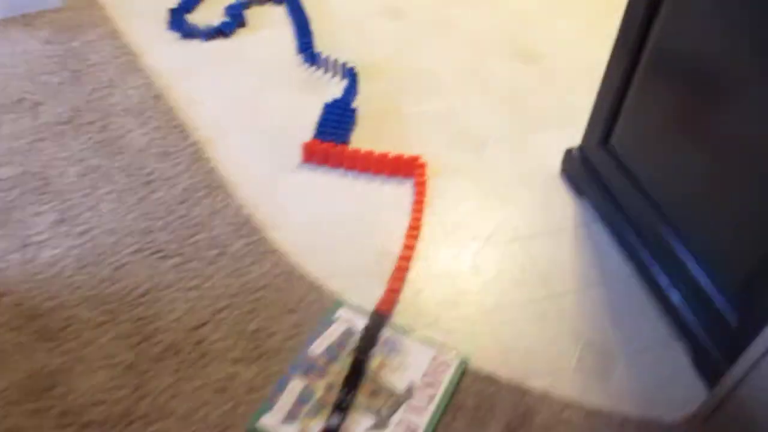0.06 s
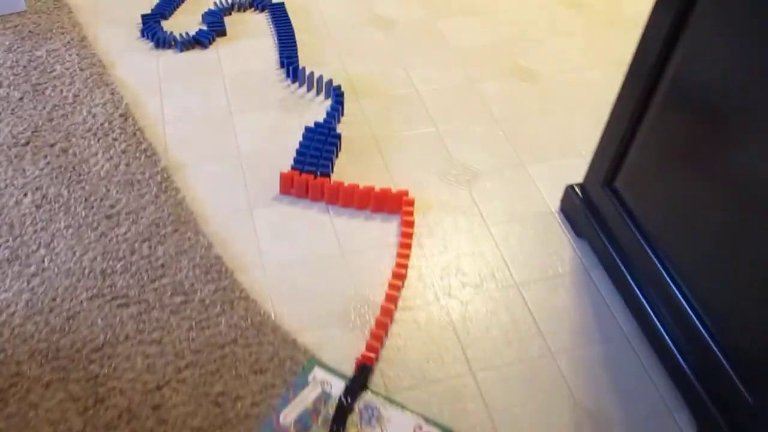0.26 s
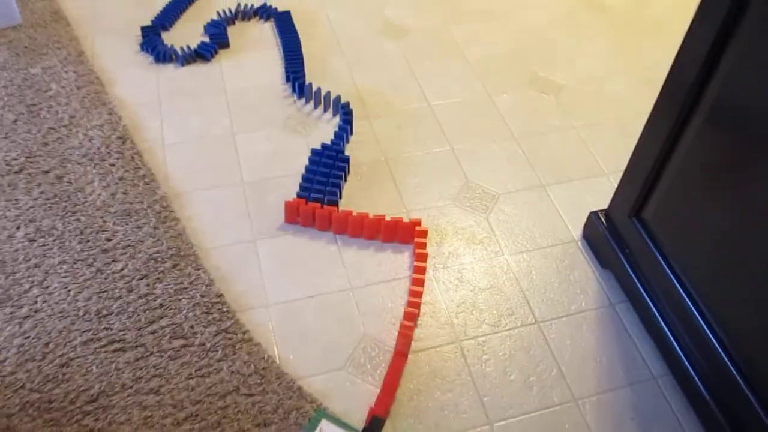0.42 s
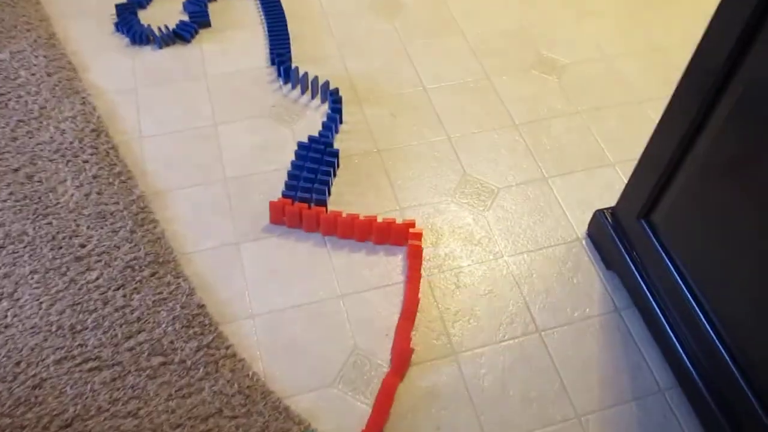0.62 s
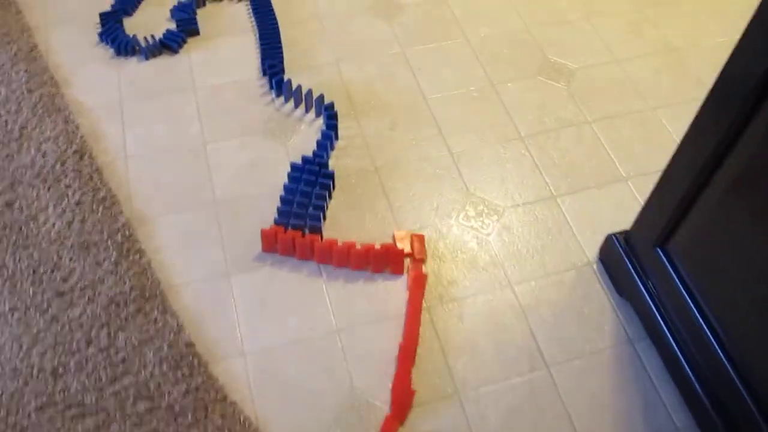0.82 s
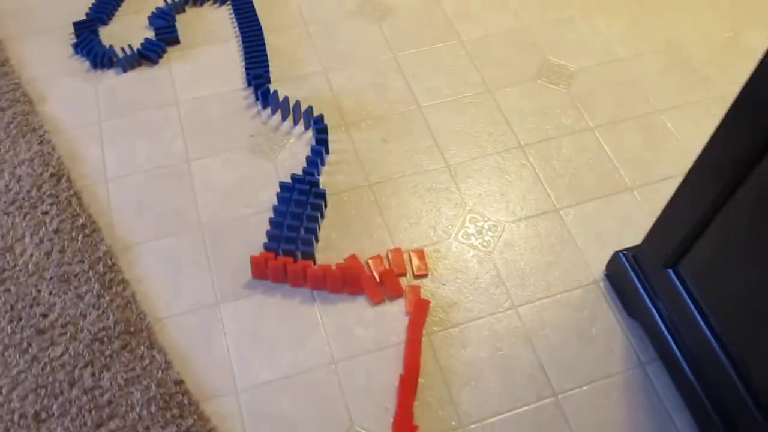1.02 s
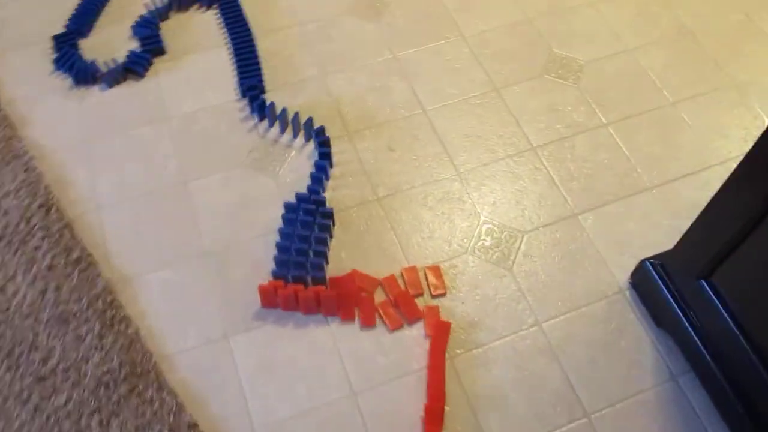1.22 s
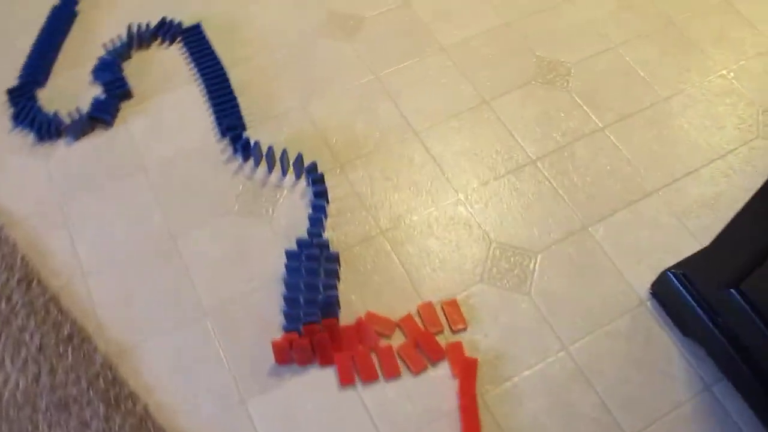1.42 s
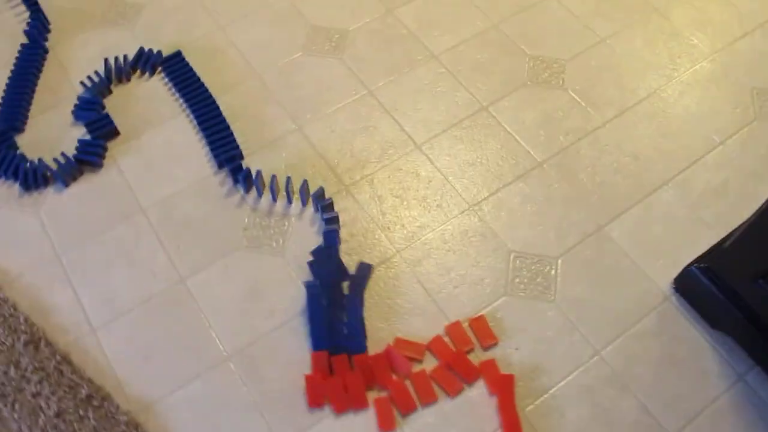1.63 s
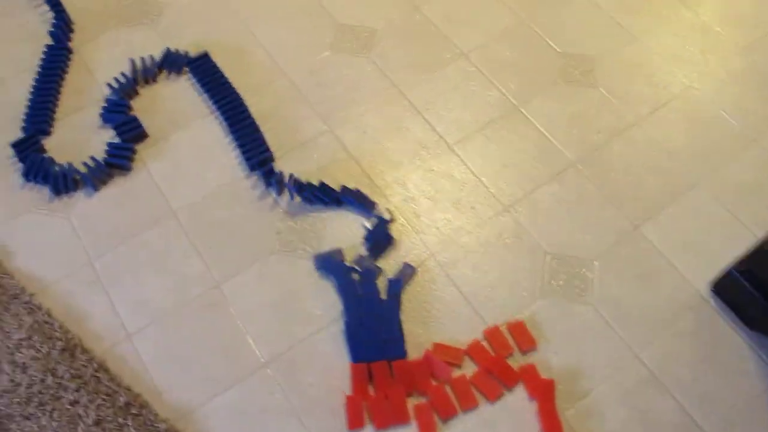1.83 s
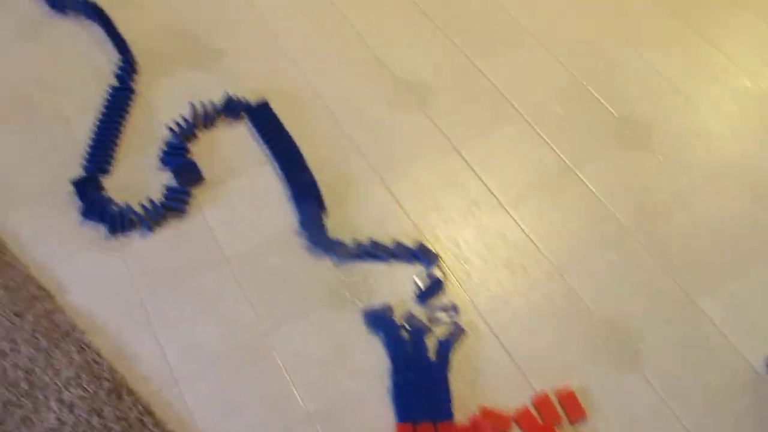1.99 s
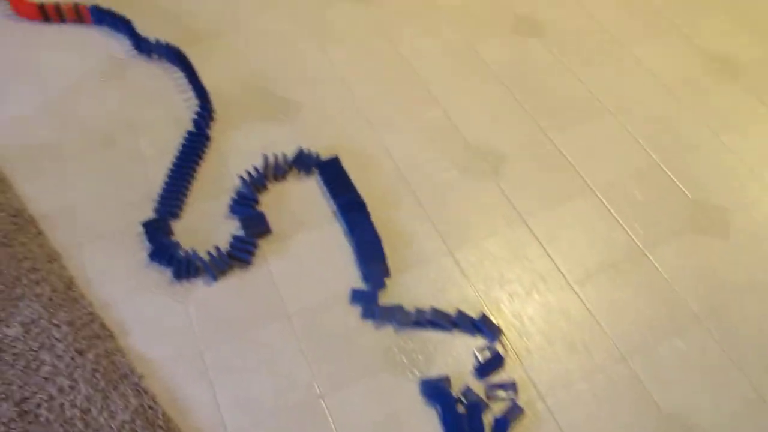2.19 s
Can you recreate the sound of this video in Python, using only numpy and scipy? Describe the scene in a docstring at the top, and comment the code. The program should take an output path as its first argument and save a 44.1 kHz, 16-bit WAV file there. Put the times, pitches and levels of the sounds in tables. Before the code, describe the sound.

A line of plastic dominoes falls on a vinyl floor, heard close up in a small room. Rapid clicking gives way to spaced clacks, then a stacked block tumbles in a loud rattle and the clicks grow fainter.

```python
"""A small kitchen, microphone close to the vinyl floor, where a line of plastic dominoes topples.
A quick run starts on a cardboard box and leads to a slow row of single clacks; then a block
collapses and the run moves away. Each knock is a hard clack plus the tile's thin ring. Leaning tiles
rattle behind the front and the floor drums under them, over a short room tail and a faint rumble."""
import sys
import numpy as np
from scipy import signal
from scipy.io import wavfile

SR = 44100
rng = np.random.default_rng(int(sys.argv[2]) if len(sys.argv) > 2 else 0)


def wav_out(sig):
    """Save sig, one row per channel (or a flat mono array), as 16-bit PCM at SR to the path in sys.argv[1]."""
    wavfile.write(sys.argv[1], SR, np.round(np.clip(np.atleast_2d(sig).T, -1, 1) * 32767).astype(np.int16))


N = 103635

UPPER_DB_PER_DB = -0.27  # the harder the knock, the smaller the share of its upper modes
# single knocks at close range (time [s], level [dB], ring [dB], tilt [dB/octave],
# clack resonance [Hz], chatter decay [s], left over right [dB])
FRONT_KNOCKS = [(0.0104, -7.5, -23, 2, 1770, 0.0018, 1.5), (0.0383, -12, -13, -2.5, 1810, 0.0042, 5),
                (0.0664, -7, -11, 12, 5640, 0.0012, 1), (0.091, -13, -14, 7, 8240, 0.0009, 4),
                (0.1078, -7, -17, 1.5, 2300, 0.001, -3), (0.234, 0, -12, -1.5, 2160, 0.0016, 1),
                (0.2643, -9.5, -4.5, 5, 5000, 0.0022, 0), (0.309, -2.5, 0.5, -1, 4950, 0.0033, -1.5),
                (0.3389, -2, 12, -1, 7600, 0.0046, 0), (0.3692, -3.5, 12, 1, 2700, 0.0063, 1),
                (0.3765, -10, 13.5, 1, 5170, 0.0015, 0), (0.4022, 2, -3, 1.5, 3570, 0.0027, 0.5),
                (0.4298, -1.5, 5.5, -2, 2400, 0.002, -8), (0.441, -1, -13, 8, 5770, 0.0032, 1),
                (0.482, -0.5, -5, -2.5, 1650, 0.0037, -2), (0.488, -2.5, -9, 6, 3000, 0.0041, -2),
                (0.515, -3.5, 10.5, -0.5, 5440, 0.0075, -11), (0.5364, -3.5, 4, 0, 1830, 0.0038, 12),
                (0.567, -7.5, 16, 5, 5550, 0.0019, -3), (0.5919, -7, -6, -4, 5510, 0.0028, -13),
                (0.593, -1, 2, 16, 4740, 0.0022, 0), (0.6197, 5.5, 7, -1, 5160, 0.011, -5),
                (0.6457, -3, 6, 5, 2650, 0.0039, -1), (0.6828, -1, 10, 9, 5200, 0.003, 0),
                (0.7492, 2, 5, 1.5, 4850, 0.0014, -5), (0.7565, 10, -9, 4, 4800, 0.0011, 0.5),
                (0.8482, 2, -34, -1.5, 4780, 0.00077, -3), (0.8855, -10, -23, -5, 4910, 0.0037, -10),
                (0.8932, -8, 0, 8, 7150, 0.0059, 0), (0.9485, -10.5, -9, 3, 6850, 0.0035, -1),
                (0.975, 10, -2.5, -1.5, 6100, 0.0023, 1.5), (1.0327, 2, -14, -0.5, 3410, 0.0056, -1),
                (1.039, -18, -17, 5, 3730, 0.0008, -7), (1.0523, 5, -6.5, 2, 2800, 0.0009, -4.5),
                (1.0772, -3.5, -11, -1.5, 2220, 0.0014, -4), (1.1344, -1, -13, -1.5, 2310, 0.0024, -3),
                (1.1615, 7, -6.5, -1, 5900, 0.0002, -1), (1.1673, -12, -17, 2, 7340, 0.00097, -3),
                (1.2208, -2.5, -4, -2.5, 5130, 0.0029, -1), (1.248, -6, -2, -1, 6780, 0.0013, -1),
                (1.267, -1, 2, -3.5, 5430, 0.0099, -1), (1.3184, -6.5, -16, -6.5, 2520, 0.00049, -4.5),
                (1.3533, 4.5, -1.5, 0.5, 2070, 0.0025, 0), (1.393, -9, 0, -5, 2235, 0.0026, 0),
                (1.405, -9, -33, -2, 1930, 0.0014, -1), (1.4344, -9, -6, -3, 1466, 0.0009, 0),
                (1.4904, -5, 5, -4, 1550, 0.0023, -1), (1.4995, -1.5, -8, 0, 2220, 0.0024, 1),
                (1.508, 1.5, -27, -2, 2330, 0.00088, -3), (1.5277, 3, -3, 0, 2080, 0.0016, -1),
                (1.58, 4, -9, -4.5, 2800, 0.0009, 1), (1.5903, 5, 3, 2, 7170, 0.0017, 0.5),
                (1.598, -6, -4, -6, 5540, 0.0018, 5), (1.622, 2, 4.5, -6, 2120, 0.0022, -2),
                (1.651, 4, -8, -4, 2500, 0.004, -2), (1.661, -5, 13, 10, 2070, 0.0031, 5),
                (1.687, 7.5, -9, 1, 2800, 0.001, -2), (1.697, 10.5, -2, 6.5, 2680, 0.0035, 1),
                (1.7405, 2, 6, 3.5, 2750, 0.0075, 0), (1.7517, -1, -2, -0.5, 2540, 0.00071, -2),
                (1.7968, -1, -11, 1.5, 2500, 0.001, -1), (1.818, 0, 5, 0, 2160, 0.0015, -1),
                (1.848, -4, 8, 6, 5800, 0.0032, 2), (1.915, -9, 3, 16, 5100, 0.0025, 3),
                (1.9192, -6, 0, -1, 5600, 0.0014, -1), (1.9473, -6.5, -12, -4, 2090, 0.003, -8),
                (1.9633, 3, -3.5, 1, 4390, 0.0014, 2), (1.9743, -3.5, -14, -1, 3940, 0.0021, -2),
                (1.99, 3, 1, 2.5, 4700, 0.0026, 1), (2.0175, -4, 4, 3, 5340, 0.001, -1),
                (2.0497, -4, -2, -1, 3900, 0.003, 1), (2.074, -14, 10.5, 3, 5350, 0.0026, -2),
                (2.121, -6.5, -3, -5.5, 4500, 0.0022, 4), (2.1567, -6.5, 0, -2, 5330, 0.0038, 1),
                (2.1789, -24, -19, -6, 3280, 0.0024, 1), (2.212, -18, -9, -8, 3400, 0.0043, 4),
                (2.241, -8.5, -10, -0.5, 3700, 0.00059, -1), (2.254, -14.5, -6, -4.5, 3200, 0.0011, 5),
                (2.287, -17, -10, -16, 3330, 0.0012, 11), (2.3053, -10, -18, -1, 3460, 0.0006, -3),
                (2.317, -19, -2, -6, 5600, 0.0017, 4), (2.3307, -9.5, -1.5, -4, 3450, 0.00052, 2)]


def knocks():
    """The front strikes tile after tile, first on the box, then on the floor; light touches tinkle most."""
    out = np.zeros((2, N))
    for s, db, ring_db, tilt_db, hz, chatter_s, pan_db in FRONT_KNOCKS:
        contact = BOX_CONTACT if s < BOX_UNTIL_S else FLOOR_CONTACT
        clack, low, upper = tile_impact(contact, tilt_db, hz, chatter_s, pan_db)
        parts = [clack, low, amp(UPPER_DB_PER_DB * db) * upper]
        add(out, s, amp(db) * damped(parts, ring_db, s))
    return out


CHATTER_DB, TILE_WIDTH = 4.5, 0.66
PEAK_DB, PEAK_OCTAVES = 7.5, 0.24  # the clack's own resonance; where the tiles meet sets its pitch
DETUNE, MODE_SPREAD_DB = 0.0078, 2.5  # scatter from tile to tile
# hard contact of tiles standing on the floor (frequency [Hz], level [dB])
FLOOR_CONTACT = [(60, -80), (200, -11.5), (600, -16.5), (1100, -3.5), (1900, 0), (3000, 1.5), (4200, 0.5),
                 (5500, -1), (7000, -2.5), (9000, -7.5), (11200, -17.5), (13200, -16), (14500, -34),
                 (16500, -51)]
# crisper tick of the first tiles, on the cardboard box (frequency [Hz], level [dB])
BOX_CONTACT = [(60, -49), (250, -2.5), (550, 1.5), (1100, -3.5), (1800, 1), (3200, -1), (6500, 1.5),
               (9000, -1.5), (12000, -4.5), (15000, -13), (16500, -26)]
# bending and twisting modes of two meeting tiles (frequency [Hz], level [dB], t60 [s])
TILE_MODES = [(5268, -22, 0.069), (5314, -23, 0.051), (5723, -29.5, 0.036), (12020, -31, 0.037),
              (13080, -25, 0.017)]


def tile_impact(contact, tilt_db, peak_hz, chatter_s, pan_db, size=4400):
    """Two tiles meet: returns the chattering clack, the lowest mode and the upper modes, in stereo."""
    t = np.arange(size) / SR
    chatter = widen(rng.standard_normal((2, size)), TILE_WIDTH) * np.exp(-t / chatter_s)
    drive = amp(CHATTER_DB) * unit(chatter)
    drive[:, 0] += 1  # first contact
    response = colour(contact, tilt_db, peak_hz, PEAK_DB)
    clack = unit(signal.fftconvolve(drive, response[None], axes=1)[:, :size])
    attack = 1 - np.exp(-2 * t / chatter_s)
    modes = []
    for hz, db, t60 in TILE_MODES:
        pitch, strength, lag = rng.standard_normal(3)
        phase = 2 * np.pi * hz * (1 + DETUNE * pitch) * t + TILE_WIDTH * np.array([[lag], [-lag]])
        decay = amp(db + MODE_SPREAD_DB * strength - 60 * t / t60)
        modes.append(attack * decay * np.sin(phase))
    pan = amp([[pan_db / 2], [-pan_db / 2]])
    return np.array([clack, modes[0], sum(modes[1:])]) * pan


UPPER_DAMPING, BOX_UPPER_DB, BOX_UNTIL_S = 0.6, -10, 0.25


def damped(parts, ring_db, s):
    """Neighbours damp a tile's lowest mode more than its upper ones; the cardboard mutes the upper ones."""
    clack, low, upper = parts
    upper_db = UPPER_DAMPING * ring_db + BOX_UPPER_DB * (s < BOX_UNTIL_S)
    return clack + amp(ring_db) * low + amp(upper_db) * upper


RATTLE_HZ, RATTLE_OCTAVES, RATTLE_TILT_DB, RATTLE_CHATTER_S = 2280, 0.74, -2.02, 0.002
RATTLE_PAN_DB, PAN_SPREAD_DB, CLICK_SPREAD_DB = -1.2, 0.5, 4.5
# tiles jostling behind the front (time [s], level [dB], ring [dB], contact rate [1/s])
JOSTLING = [(0, -43, -25, 610), (.17, -39.5, 9, 420), (.22, -50.5, -17, 310), (.33, -42.5, -21.5, 430),
            (.45, -32, 8.5, 520), (.58, -31, -5, 740), (.68, -28, 4, 980), (.79, -50, 14.5, 400),
            (.94, -41.5, -2, 550), (1.06, -37.5, -16, 380), (1.33, -37, -24, 364), (1.45, -34, -3.5, 660),
            (1.62, -24.5, -1.5, 1400), (1.78, -35, 7, 615), (1.92, -32.5, -5, 900), (2.0, -34, 5.5, 840),
            (2.12, -37.5, -9, 460), (2.35, -47, -6, 530)]


def rattle(count=64):
    """Leaning tiles jostle and settle in many small contacts; pinned tiles hardly ring."""
    level_db, ring_db, rate = (curve(JOSTLING, column) for column in (1, 2, 3))
    sizes = amp(CLICK_SPREAD_DB * np.clip(rng.standard_normal(N), -2, 2))
    sizes /= np.sqrt(np.mean(sizes ** 2))
    touches = rng.random(N) < rate / SR
    clicks = touches * sizes * amp(level_db) * np.sqrt(SR / rate)
    tile = rng.integers(0, count, N)
    variants = [(RATTLE_TILT_DB + tilt, RATTLE_HZ * 2 ** (RATTLE_OCTAVES * pitch),
                 RATTLE_CHATTER_S, RATTLE_PAN_DB + PAN_SPREAD_DB * pan)
                for tilt, pitch, pan in rng.standard_normal((count, 3))]
    on_box = [tile_impact(BOX_CONTACT, *variant) for variant in variants]
    on_floor = [tile_impact(FLOOR_CONTACT, *variant) for variant in variants]
    out = np.zeros((2, N))
    for i in np.flatnonzero(clicks):
        s = i / SR
        impacts = on_box if s < BOX_UNTIL_S else on_floor
        add(out, s, clicks[i] * damped(impacts[tile[i]], ring_db[i], s))
    return out


THUD_HZ, THUD_DECAY_S = 55.3, 0.0097
# drumming of the floor under the tiles (time [s], level [dB])
DRUM_LEVEL = [(0, -54.5), (.2, -55.5), (.35, -48.5), (.55, -48.5), (.69, -37), (.8, -46.5), (1.0, -53),
              (1.45, -55.5), (1.66, -46), (1.76, -45.5), (1.86, -44.5), (2.05, -49.5), (2.35, -50)]
# resonances of the vinyl floor (frequency [Hz], level [dB])
FLOOR_SPECTRUM = [(25, -30), (45, -32), (95, -26), (150, -7.5), (185, -20.5), (220, 1.5), (260, -2),
                  (305, 4.5), (345, -5.5), (395, -0.5), (470, -4.5), (700, -1.5), (1400, -34)]
# heavy landings (time [s], level [dB])
LANDINGS = [(.757, -52), (1.628, -41), (1.686, -53)]


def floor():
    """Falling tiles drum on the floor, dead centre; the heaviest landings give a soft thud."""
    rate = curve(JOSTLING, column=3)
    taps = rng.standard_normal(N) * (rng.random(N) < rate / SR) / np.sqrt(rate)
    body = signal.fftconvolve(taps, colour(FLOOR_SPECTRUM, size=4096))[:N]
    drum = unit(body) * np.sqrt(N) * amp(curve(DRUM_LEVEL))
    out = np.array([drum, drum])
    t = np.arange(SR // 10) / SR
    thud = np.sin(2 * np.pi * THUD_HZ * t) * np.exp(-t / THUD_DECAY_S)
    for s, db in LANDINGS:
        add(out, s, amp(db) * thud[None])
    return out


ROOM_DB, ROOM_WIDTH, ROOM_ONSET_S = -7, 0.48, 0.002
# reverberation of the kitchen (frequency [Hz], t60 [s])
KITCHEN_DECAY = [(200, 0.98), (1000, 1), (3000, 0.39), (6000, 0.39), (14000, 0.19)]


def room(x):
    """The short diffuse tail of the small kitchen; the treble dies first."""
    noise = widen(rng.standard_normal((2, SR // 2)), ROOM_WIDTH)
    hz, t, spectra = signal.stft(noise, SR, nperseg=256)
    decay = amp(-60 * t / read(KITCHEN_DECAY, hz)[:, None])
    tail = signal.istft(spectra * decay, SR, nperseg=256)[1]
    onset = np.minimum(np.arange(tail.shape[1]) / SR / ROOM_ONSET_S, 1)
    return signal.fftconvolve(x, amp(ROOM_DB) * unit(tail * onset), axes=1)[:, :N]


RUMBLE_DB = -64
# room tone of the kitchen (frequency [Hz], level [dB])
ROOM_TONE = [(25, -1), (45, -4.5), (90, -3.5), (150, 9.5), (300, -1), (1000, -17), (8000, -41)]


def rumble():
    """The room's steady low background, far below the tiles."""
    noise = signal.fftconvolve(rng.standard_normal(N), colour(ROOM_TONE, size=4096))[:N]
    return amp(RUMBLE_DB) * np.sqrt(N) * unit(noise)


def amp(db):
    """Decibels to gain."""
    return 10 ** (np.asarray(db) / 20)


def unit(x):
    """Scales to a mean energy of 1 per channel."""
    return x / np.sqrt(np.mean(np.sum(x ** 2, -1)) + 1e-20)


def read(points, hz):
    """Reads a table on a log-frequency axis."""
    f, value = np.transpose(points)
    return np.interp(np.log(hz + 1), np.log(f), value)


def curve(points, column=1):
    """One column of a time table, at every sample."""
    table = np.array(points)
    return np.interp(np.arange(N) / SR, table[:, 0], table[:, column])


def add(mix, s, sound):
    """Mixes a sound in at time s."""
    part = mix[:, max(round(s * SR), 0):][:, :sound.shape[1]]
    part += sound[:, :part.shape[1]]


def widen(pair, width):
    """Mid and side become left and right."""
    mid, side = pair
    return np.array([mid + width * side, mid - width * side])


def colour(points, tilt_db=0, peak_hz=1000, peak_db=0, size=1024):
    """Causal impulse response of a spectrum, tilted through the middle range and with one resonance."""
    hz = abs(np.fft.fftfreq(size, 1 / SR))
    octaves = np.log2(np.clip(hz, 1200, 8000))
    peak = peak_db * np.exp(-.5 * (np.log2((hz + 1) / peak_hz) / PEAK_OCTAVES) ** 2)
    log_gain = np.log(amp(read(points, hz) + tilt_db * octaves + peak))
    minimum_phase = np.exp(np.conj(signal.hilbert(log_gain)))
    return np.fft.ifft(minimum_phase).real


KNOCK_ROOM_DB = -2


def scene():
    """Tiles, room and floor; the clear knocks face the microphone and sound drier."""
    front, behind = knocks(), rattle()
    return front + behind + room(amp(KNOCK_ROOM_DB) * front + behind) + floor() + rumble()


MONO_BELOW_HZ, TOP_HZ = 890, 16500


def record(dry):
    """A close microphone pair hears the bass alike; peaks clip at full scale, then the top is cut."""
    highpass = signal.butter(1, MONO_BELOW_HZ, "high", fs=SR)
    side = signal.lfilter(*highpass, (dry[0] - dry[1]) / 2)
    heard = np.clip(widen([dry.mean(0), side], width=0.78), -1, 1)
    lowpass = signal.firwin(255, TOP_HZ, window=("kaiser", 9), fs=SR)
    return signal.oaconvolve(heard, lowpass[None], "same")


dry = scene()
out = record(dry)
wav_out(out)
```